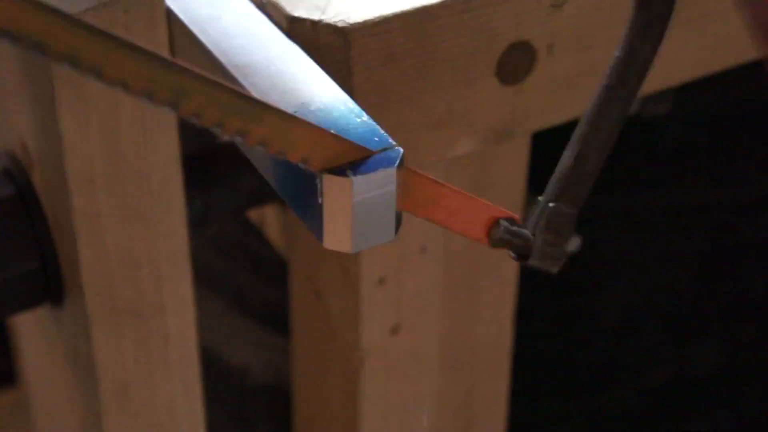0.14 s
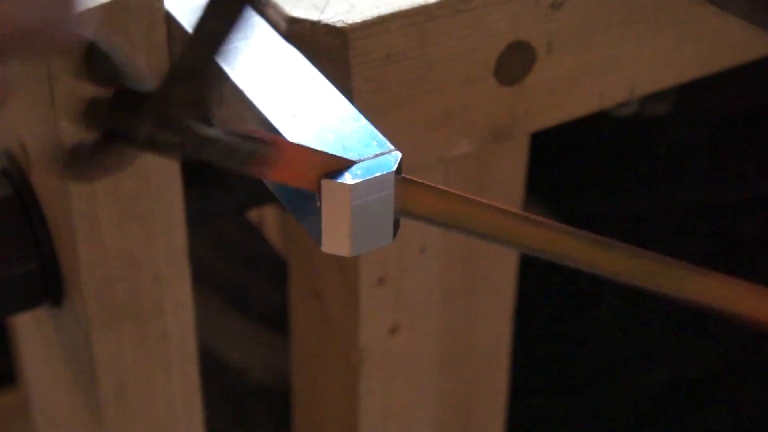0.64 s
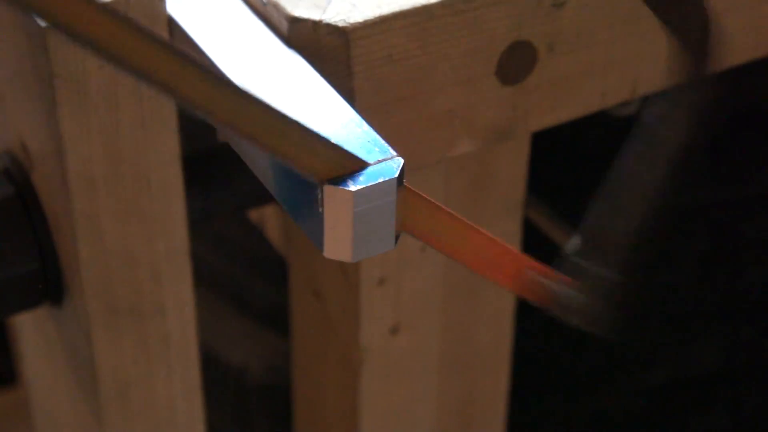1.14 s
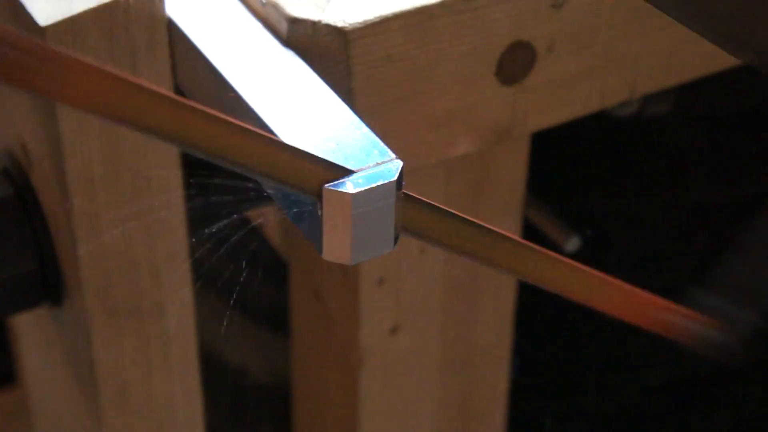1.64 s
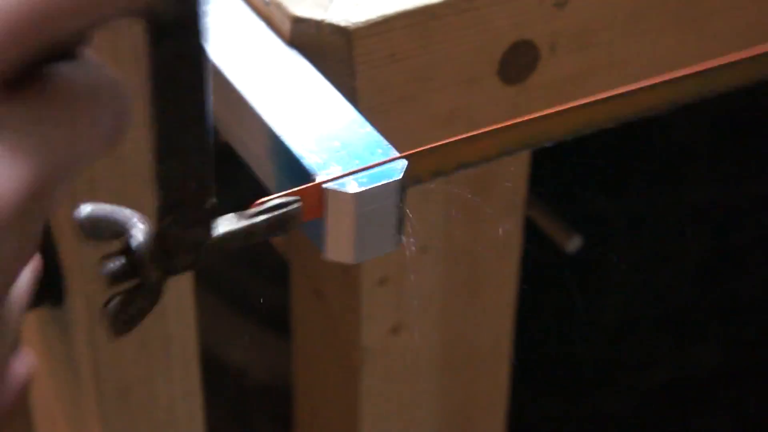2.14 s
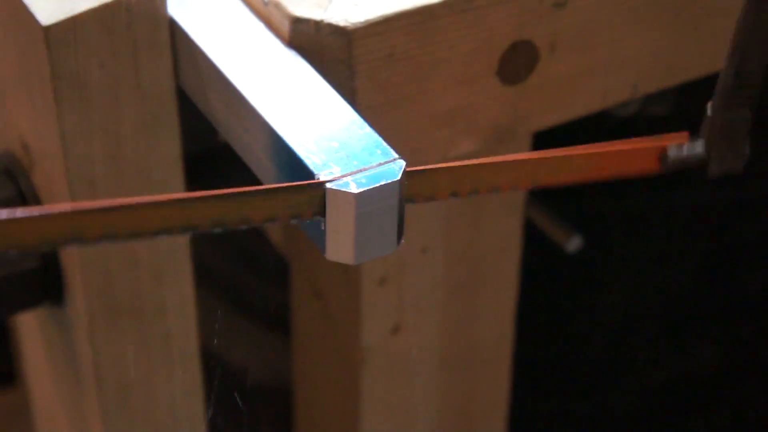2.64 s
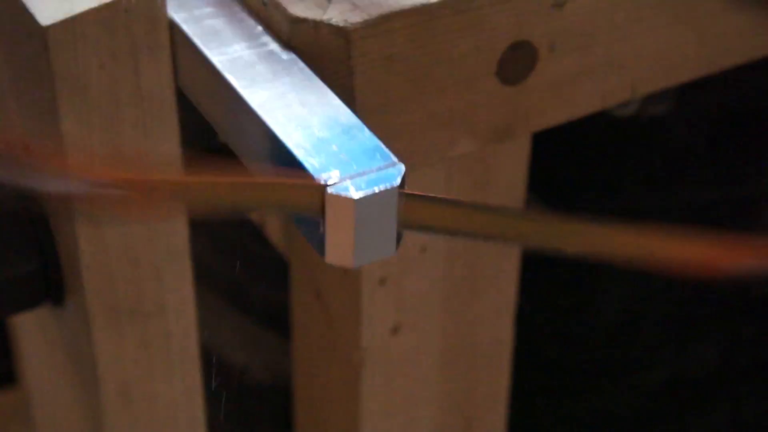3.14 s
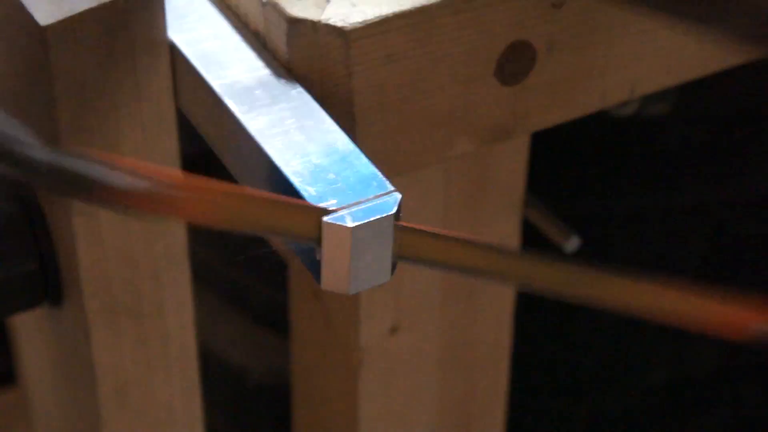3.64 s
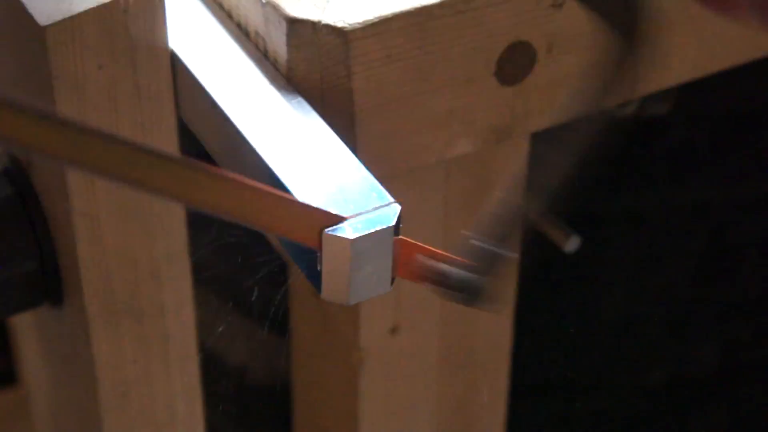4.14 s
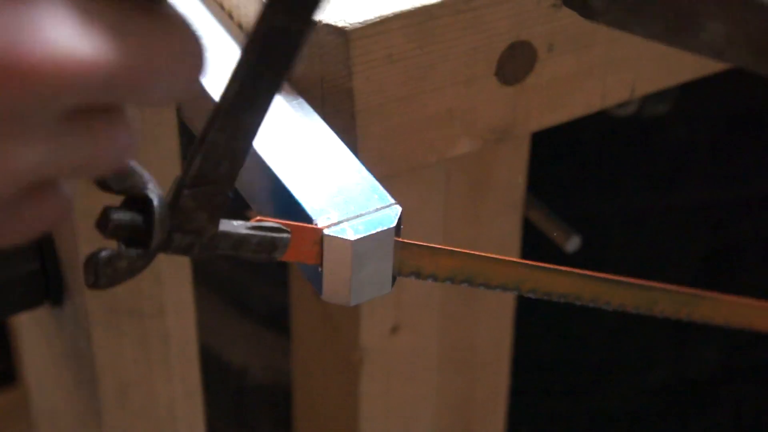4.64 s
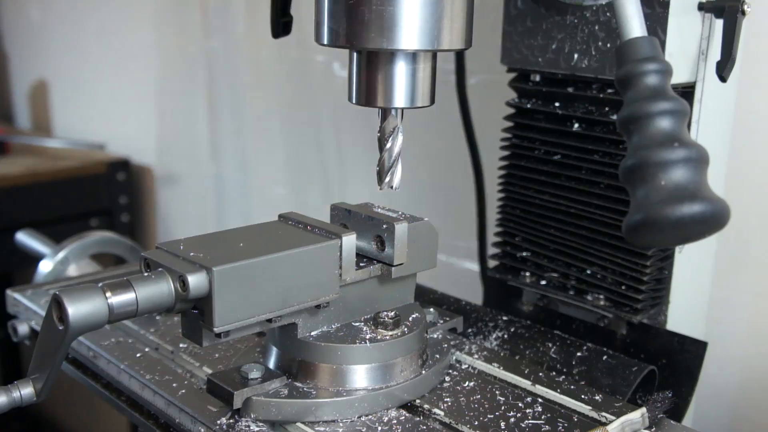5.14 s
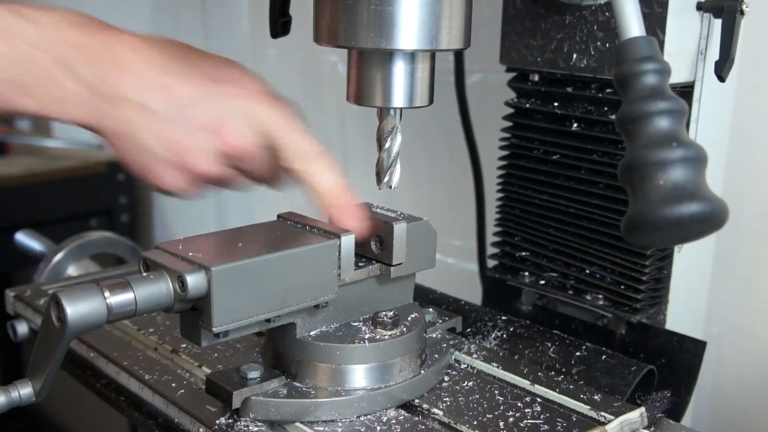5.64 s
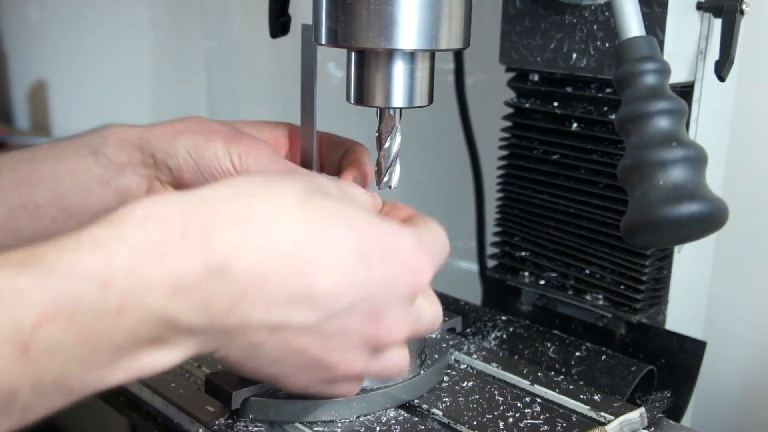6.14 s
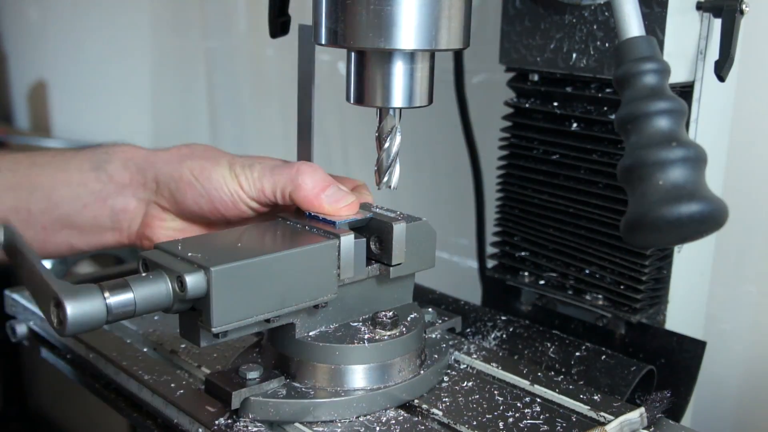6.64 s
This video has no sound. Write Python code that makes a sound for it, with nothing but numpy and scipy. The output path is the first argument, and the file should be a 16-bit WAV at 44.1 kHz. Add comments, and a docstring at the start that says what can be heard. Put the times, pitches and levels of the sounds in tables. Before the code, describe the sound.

Very fast metallic saw strokes buzz close and dry for over four seconds, followed by small clinks, a brief silence, and soft vise handling.

```python
"""At a wooden bench, close and dry, in stereo: a hacksaw cuts a clamped aluminium bar, played back fast,
about 22 short strokes a second. Clicks of the teeth hiss and ring blade and frame; each push booms in the bench.
The sawing stops; puffs of noise are the hands' brushes and taps on steel, while the blade slides out.
After some 30 ms of silence with a tick near its end comes a quiet workshop: more ticks, steel pieces set
into a vise with taps that ring tuned resonances, rustle of hands and cloth, room noise and a faint hum."""
import sys
import numpy as np
from scipy import signal
from scipy.fft import rfft, irfft, next_fast_len
from scipy.io import wavfile

SR = 44100
rng = np.random.default_rng(int(sys.argv[2]) if len(sys.argv) > 2 else 0)


def volts_from_db(level):
    """Convert decibel levels to linear amplitude ratios."""
    exponent = np.asarray(level, float) / 20
    return 10 ** exponent


def unload_wav(signal):
    """Save mono or channel-first audio to the path in sys.argv[1] as 16-bit WAV at rate SR, clipped to [-1, 1]."""
    wavfile.write(
        sys.argv[1],
        SR,
        np.round(np.clip(np.atleast_2d(signal).T, -1, 1) * 32767).astype(np.int16),
    )


N = 298557

# saw strokes, forward and return in turn: (turn time [s], force on the teeth [dB], push on the bench [dB])
STROKES = [(-.02, -25.5, -21), (0.022, -28, -23), (0.068, -29.5, -27.5), (0.111, -26.5, -25),
           (0.157, -26, -26.5), (0.201, -24, -20), (0.248, -25, -26), (0.293, -26.5, -22.5),
           (.337, -26.5, -28), (0.391, -24.5, -22), (.435, -26, -24.5), (0.48, -25.5, -26),
           (0.522, -30.5, -26), (0.566, -27, -21.5), (0.611, -30, -26), (0.657, -27.5, -20.5),
           (.698, -29.5, -22), (0.741, -29.5, -22.5), (0.787, -28, -26), (0.831, -28.5, -23.5),
           (0.874, -27, -26), (0.918, -24, -21), (.965, -28, -24), (1.008, -29, -23.5), (1.049, -30, -27.5),
           (1.096, -25, -21), (1.146, -27.5, -23.5), (1.19, -29, -24.5), (1.232, -25.5, -24),
           (1.274, -25, -22), (1.321, -28, -21.5), (1.367, -26, -22.5), (1.411, -29, -23.5),
           (1.454, -25, -21.5), (1.501, -28.5, -22.5), (1.544, -31, -23), (1.59, -29.5, -25.5),
           (1.633, -26.5, -21.5), (1.675, -29, -24), (1.723, -26.5, -23), (1.764, -27.5, -27),
           (1.811, -28, -25), (1.891, -33.5, -40.5), (1.98, -23.5, -18.5), (2.011, -30, -21.5),
           (2.056, -27.5, -21), (2.111, -27.5, -23.5), (2.157, -30, -22.5), (2.205, -33, -22.5),
           (2.25, -30, -26), (2.288, -33, -25), (2.335, -30.5, -22), (2.379, -33, -22),
           (2.419, -29.5, -23.5), (2.464, -33, -23.5), (2.506, -28.5, -17), (2.552, -31, -23.5),
           (2.601, -29.5, -19), (2.644, -30.5, -23), (2.694, -29, -19), (2.735, -30.5, -27),
           (2.886, -25.5, -20.5), (2.927, -27, -22), (2.985, -25.5, -23.5), (3.029, -26, -20),
           (3.078, -26.5, -23), (3.123, -24.5, -23.5), (3.17, -26, -24), (3.212, -25, -25),
           (3.261, -27, -25), (3.31, -23, -25), (3.355, -24.5, -22.5), (3.4, -25, -27),
           (3.448, -26.5, -25.5), (3.488, -30, -26.5), (3.542, -25.5, -24.5), (3.585, -29, -28),
           (3.635, -25, -24), (3.68, -26, -23.5), (3.727, -23.5, -23.5), (3.768, -27.5, -24.5),
           (3.822, -24.5, -22), (3.867, -24.5, -24), (3.912, -22, -21.5), (3.957, -27.5, -25),
           (4.011, -23.5, -23), (4.055, -27, -26), (4.106, -25.5, -24.5), (4.15, -24.5, -24.5),
           (4.201, -24, -23), (4.246, -28, -26), (4.296, -22, -22), (4.336, -26, -27), (4.384, -24, -23.5),
           (4.426, -26.5, -26.5), (4.477, -23.5, -28), (4.52, -23, -26), (4.564, -23.5, -23)]
# spectrum shape of the tooth hiss: (frequency [Hz], relative density [dB per Hz])
TEETH_SPECTRUM = [(710, -34), (1200, -4), (1940, -12), (2270, -11.5), (2760, -9.5), (3740, -4.5),
                  (4420, -0.5), (5300, -10), (5900, -7), (9880, -11.5), (11200, -18), (13000, -24)]
# spectrum shape of the wooden bench: (frequency [Hz], relative density [dB per Hz])
BENCH_SPECTRUM = [(71, -38), (120, -39), (420, -19), (673, -5.5), (893, -11.5), (994, -8), (1180, -14.5),
                  (1950, -19.5), (2520, -24), (3000, -21.5), (3900, -32.5), (6600, -120)]
# resonances of bench, frame and blade: (frequency [Hz], width [Hz], level against the driving force [dB])
LOW_BENCH_MODES = [(197.6, 50, -38), (569.5, 27, -21), (631.7, 28, -22), (658.3, 45, -14.5), (700, 27, -15),
                   (773.5, 77, -14), (842, 54, -19.5)]
UPPER_BENCH_MODES = [(918, 260, -23.5), (985, 130, -21.5), (1029, 110, -25)]
FRAME_MODES = [(1310, 107, -20), (1401, 77, -23), (1542, 100, -23.5), (1768, 310, -27.5), (1846, 210, -23),
               (1996, 160, -22), (2696, 71, -26.5)]
LOW_BLADE_MODES = [(4410, 180, -16), (4637, 260, -18)]
HIGH_BLADE_MODES = [(5075, 380, -6.5), (5234, 230, -12), (5470, 290, -17), (6810, 130, -30.5),
                    (7850, 580, -22)]
# stereo place of the saw: (frequency [Hz], left minus right [dB])
SAW_BALANCE = [(60, -2.0), (230, 0), (900, -3.5), (3480, 1), (13400, 2)]
# slow change of colour: (time [s], upper bench modes [dB], frame modes [dB], low blade modes [dB],
# high blade modes [dB], tooth treble above 7 kHz [dB])
SAW_COLOUR = [(0, -8, 4, 4, -3.5, -5), (.55, 9, 10.5, 2, -8, 1), (1.1, -5.5, 8, -2, -4.5, 2.5),
              (1.6, 8, 7, -3, -7.5, 2.8), (2.0, 5, 1, -8, -5, -4.5), (2.3, -5.5, 13.5, -16, -6.5, 6),
              (2.8, -10, -1.5, -2, -3.5, 0), (3.15, 2, -18, 0, 1.5, -2), (3.9, 2.5, -41, -1, -3, -6),
              (4.6, 2.5, 1.5, -5, 0, -7)]
# the blade hardly lifts between forward and return while the saw is tipped down:
# (time [s], level added at that turn [dB])
RETURN_TURN = [(1.8, 0.5), (2.0, 9), (2.55, 4), (2.7, -3), (2.95, -2)]
# teeth that snag and knock the frame and bench: (time [s], level of the main tone [dB], ringing [Hz])
SNAGS = [(.037, -18, 779), (.123, -17, 660), (.301, -20, 730), (.404, -14.5, 1018), (.491, -18.5, 840),
         (.757, -15.5, 959), (.928, -26, 900), (1.173, -20.5, 700), (1.374, -18.5, 680),
         (1.735, -19.5, 837), (1.825, -16.5, 850), (1.988, -18.5, 627), (2.067, -19, 985),
         (2.171, -16, 935), (2.213, -20.5, 1250), (2.259, -13, 962), (2.344, -13, 1036),
         (2.437, -14.5, 987), (2.519, -14.5, 980), (2.612, -12, 837), (2.656, -18.5, 670),
         (2.704, -9.5, 756), (2.902, -17, 748), (2.997, -16, 760), (3.177, -15.5, 691), (3.236, -18.5, 985),
         (3.372, -18.5, 1003), (3.414, -18, 656), (3.466, -20, 1033), (3.652, -25, 997), (3.92, -24, 746),
         (4.114, -16, 668), (4.349, -22.5, 653), (4.397, -21.5, 812), (4.493, -16, 993),
         (4.572, -15.5, 637)]
# background of the two rooms: (time [s], room noise [dB], rustle [dB])
ROOM_LEVELS = [(4.5, -64, -54), (4.66, -70, -57), (4.69, -56.5, -59.5), (4.89, -58.5, -62),
               (5.01, -60.5, -66), (5.12, -63, -77), (5.2, -60, -68), (5.36, -58.5, -63.5),
               (5.52, -60, -65.5), (5.86, -59.5, -69), (6.29, -56, -67.5), (6.47, -58.5, -70),
               (6.77, -58, -71)]
# spectrum shapes of room noise and of rustling: (frequency [Hz], relative density [dB per Hz])
ROOM_SPECTRUM = [(71, -50), (120, -16), (208, -5.5), (238, -6.5), (389, -7.5), (773, -7), (1310, -13.5),
                 (2500, -18.5), (4970, -29.5), (11100, -36), (12200, -34), (13000, -66)]
RUSTLE_SPECTRUM = [(600, -17), (1800, -6), (3500, -7.5), (7000, -11.5), (11000, -12.5), (13000, -47)]
# hum of the second room: (frequency [Hz], width [Hz], level [dB])
HUM_TONES = [(241, 2.5, -69), (280, 2.5, -68), (302, 2.5, -72), (355, 2.5, -69), (2570, 60, -70)]
# low rumble: (time [s], level [dB])
RUMBLE_LEVEL = [(0, -73.5), (2.25, -71), (2.45, -55), (2.65, -73.5), (4.4, -69), (4.65, -81), (5.5, -71.5),
                (6.77, -65.5)]
# fingers and cloth brush against metal: (time [s], nominal peak [dB], length scale [ms])
TOUCHES = [(4.7087, -37.5, 20.5), (4.753, -50, 13), (5.063, -53, 20), (5.1386, -54, 18), (5.2067, -46, 12),
           (5.2717, -45.5, 12), (5.31, -56, 6), (5.342, -48, 24), (5.3836, -48, 13), (5.418, -42.5, 19),
           (5.462, -51, 8), (5.529, -45.5, 16), (5.71, -56, 14), (5.749, -49, 13), (5.804, -48.5, 13),
           (5.8541, -50.5, 10.5)]
# steel meets steel: (time [s], nominal peak [dB], centre [Hz], length scale [ms], drive to the steel's ring [dB])
KNOCKS = [(4.9465, -37, 7140, 12, -10.5), (4.9838, -28.5, 7660, 12.6, -27), (5.034, -28, 6400, 12.4, -27),
          (6.0711, -31.5, 3380, 5, -0.5), (6.073, -38.5, 945, 10.4, -30), (6.073, -34.5, 2830, 10, -30),
          (6.0898, -39, 2360, 7.9, -32), (6.1033, -39, 2440, 9.4, -13.5), (6.196, -47, 2500, 7, -30),
          (6.2273, -42.5, 5040, 8, -15), (6.2488, -38.5, 3280, 7.7, -24), (6.2951, -49, 3000, 11, -30),
          (6.31, -48, 3500, 11, -30), (6.3275, -42, 4200, 9.1, -28), (6.4113, -41.5, 5000, 6.8, 2)]
# resonances of the steel pieces: (frequency [Hz], width [Hz], level against the drive [dB])
STEEL_MODES = [(1050, 140, -9), (1950, 130, -10), (3450, 280, -13), (4300, 280, -12), (6900, 270, -7),
               (8660, 86, 5)]
# the blade slides out of the cut: (time [s], rub level [dB])
SLIDE_LEVEL = [(4.74, -92), (4.876, -61), (5.01, -65.5), (5.08, -90)]
# blade resonances under the slide: (frequency [Hz], width [Hz], level against the rub [dB])
SLIDE_MODES = [(2136, 273, 3.5), (4600, 650, -2), (6600, 400, -10)]
# thin dry ticks: (time [s], peak before the stereo tilt [dB])
TICKS = [(5.112, -44), (5.1546, -33.5), (5.1973, -38), (5.24, -40)]

PAUSE_S = .066   # a longer wait for the next turn is a pause; the stroke after it goes forward
LAST_STROKE_S = 0.045   # length of a stroke before a pause
# shape of a stroke, (forward, return): level at the turn before it [dB], turn to full force [ms]
TEETH_TURN_DB, BITE_MS = (-46, -46), (13, 20.2)
BENCH_TURN_DB, PUSH_MS = (-33.5, -30), (20.3, 18)
PUSH_LATER_MS_PER_S = (2.87, .3)   # the push on the bench peaks later as the cut deepens
TEETH_RELEASE_DB_PER_S, BENCH_RELEASE_DB_PER_S = 332, 369   # in a pause
LEAD_IN_DB_PER_S = 500   # the blade settles into the cut before the stroke that ends a pause
SNAG_T60_S = 0.06
TOUCH_HZ, TOUCH_OCTAVES, TOUCH_RING_DB = 2500, 6.5, -25
KNOCK_OCTAVES, TAP_TOP_HZ = 1.43, 12200
PUFF_CREST_DB = 4.5   # allowance for the peak of a noise puff above its rms
SILENCE_S, RETURN_S, FADE_IN_S = 5.083, 5.113, 0.0069
MIC_STOP_HZ = 13600   # the microphone's treble is 50 dB down from here up


def in_time(seconds, values):
    """Points joined by straight lines, one value a sample."""
    return np.interp(np.arange(N) / SR, seconds, values)


def at_hz(points, hz):
    """A spectrum read on a log-frequency axis."""
    point_hz, point_db = np.transpose(points)
    return np.interp(np.log(hz + 1), np.log(point_hz), point_db)


def colour(x, spectrum):
    """A smooth spectrum laid on x; white input keeps its rms."""
    size = next_fast_len(N + 4096)
    gain = volts_from_db(at_hz(spectrum, np.arange(size // 2 + 1) * SR / size))
    gain = gain / np.sqrt(np.mean(gain ** 2))
    return irfft(rfft(x, size) * gain, size)[..., :N]


def resonate(x, hz, width_hz):
    """One resonance as a two-pole filter; white input keeps its rms."""
    r = np.exp(-np.pi * width_hz / SR)
    b = np.sqrt((1 - r * r) / 2) * np.array([1, 0, -1])
    return signal.lfilter(b, [1, -2 * r * np.cos(2 * np.pi * hz / SR), r * r], x + 1e-18)


def grains(per_s, spread_db):
    """Random clicks of uneven size, unrelated in the two channels; overall rms 1."""
    uneven = volts_from_db(spread_db * np.minimum(rng.exponential(1, (2, N)), 5))
    sizes = uneven * rng.standard_normal((2, N))
    clicks = sizes * (rng.random((2, N)) < per_s / SR)
    return clicks / np.sqrt(np.mean(clicks ** 2))


def stroke_level(peak_db, turn_db, rise_ms, later_ms_per_s, release_db_per_s, roundness):
    """Force dips at each turn, rounds over a peak within the stroke and dies away in a pause."""
    turn_s = np.array(STROKES)[:, 0]
    wait_s, count = np.diff(turn_s, append=np.inf), np.arange(len(turn_s))

    # 0 forward, 1 return; the first row is a return
    fresh = np.where(np.roll(wait_s, 1) > PAUSE_S, count, 0)
    fresh[0] = 0
    way = (count - np.maximum(np.maximum.accumulate(fresh), 1)) % 2

    length_s = np.where(wait_s > PAUSE_S, LAST_STROKE_S, wait_s)
    rise_s = (np.take(rise_ms, way) + np.take(later_ms_per_s, way) * turn_s) / 1000
    rise_s = np.minimum(rise_s, .9 * length_s)

    # k: the stroke under way at each sample
    k = np.searchsorted(turn_s, np.arange(N) / SR, "right") - 1
    since = np.arange(N) / SR - turn_s[k]
    rising = since < rise_s[k]
    falling_part = np.minimum((since - rise_s[k]) / (length_s - rise_s)[k], 1)
    off_peak = np.where(rising, 1 - since / rise_s[k], falling_part)

    # the nearer turn, named by the stroke that it begins
    next_way = np.where(rising, way[k], 1 - way[k])
    low_db = np.take(turn_db, next_way) + next_way * in_time(*np.transpose(RETURN_TURN))
    level_db = peak_db[k] - np.maximum(peak_db[k] - low_db, 6) * off_peak ** roundness
    fading_db = level_db - release_db_per_s * np.maximum(since - length_s[k], 0)
    settling_db = turn_db[0] - 6.5 - LEAD_IN_DB_PER_S * (wait_s[k] - since)
    return volts_from_db(np.maximum(fading_db, settling_db))


def ring_modes(force, modes, drift_db, scatter_db, wander):
    """Every stroke meets each mode with a strength and a slightly shifted pitch of its own."""
    turn_s, out = np.array(STROKES)[:, 0], np.zeros((2, N))
    end = round((turn_s[-1] + .2) * SR)
    stroke = np.searchsorted(turn_s, np.arange(end) / SR)
    driven = (force * volts_from_db(drift_db))[:, :end] + 1e-18
    for hz, width_hz, level_db in modes:
        chance = rng.standard_normal((2, len(turn_s) + 1))
        gain = volts_from_db(level_db + scatter_db * chance[0])[stroke]
        pitch_hz = (hz * (1 + wander * chance[1]))[stroke]
        turning = np.exp(2j * np.pi * np.cumsum(pitch_hz) / SR)
        # a moving resonance: shift its centre down to 0 Hz, low-pass twice, shift back
        r = np.exp(-np.pi * width_hz / SR)
        shifted = driven * (gain * turning.conj())
        slow = signal.lfilter([np.sqrt(8 * (1 - r) ** 3)], [1, -2 * r, r * r], shifted)
        out[:, :end] += (slow * turning).real
    return out


def brighten(x, treble_db):
    """A shelf above 7 kHz that changes in time."""
    low = signal.sosfilt(signal.butter(1, 7000, fs=SR, output="sos"), x)
    return low + volts_from_db(treble_db) * (x - low)


def blade(bite, low_db, high_db):
    """Tooth impacts ring the blade's low and high resonances."""
    low = ring_modes(bite, LOW_BLADE_MODES, low_db, scatter_db=5.5, wander=0.014)
    return low + ring_modes(bite, HIGH_BLADE_MODES, high_db, scatter_db=2.5, wander=0.025)


def bench(push, upper_db):
    """The push of each stroke booms in the wood: a broad body of noise and separate resonances."""
    body = volts_from_db(-1.5) * colour(push, BENCH_SPECTRUM)
    low = ring_modes(push, LOW_BENCH_MODES, 0, scatter_db=3.0, wander=0.021)
    return body + low + ring_modes(push, UPPER_BENCH_MODES, upper_db, scatter_db=6.5, wander=0.014)


def hacksaw():
    """Tooth impacts hiss and ring blade and frame; the push of the stroke shakes the bench."""
    turn_s, bite_db, push_db = np.transpose(STROKES)
    s, *drifts = np.transpose(SAW_COLOUR)
    upper_db, frame_db, low_blade_db, high_blade_db, treble_db = [in_time(s, d) for d in drifts]
    bite = grains(20000, spread_db=1.5) * stroke_level(
        bite_db, TEETH_TURN_DB, BITE_MS, (0, 0), TEETH_RELEASE_DB_PER_S, roundness=1.78)
    push = grains(9000, spread_db=1.5) * stroke_level(
        push_db, BENCH_TURN_DB, PUSH_MS, PUSH_LATER_MS_PER_S, BENCH_RELEASE_DB_PER_S, roundness=1.1)

    teeth = volts_from_db(-4.0) * brighten(colour(bite, TEETH_SPECTRUM), treble_db)
    frame = ring_modes(bite, FRAME_MODES, frame_db, scatter_db=5.0, wander=0.02)
    high = teeth + blade(bite, low_blade_db, high_blade_db)
    low = bench(push, upper_db) + frame + snags()

    # high and low parts each take the left-right balance of one frequency
    side = np.array([[.5], [-.5]])
    saw = high * volts_from_db(side * at_hz(SAW_BALANCE, 3200)) + low * volts_from_db(side * at_hz(SAW_BALANCE, 820))
    return signal.sosfilt(signal.butter(2, 90, "high", fs=SR, output="sos"), saw)


def room():
    """Broad room noise, a brighter rustle of hands and cloth, and wavering hum tones in the second room."""
    s, noise_db, rustle_db = np.transpose(ROOM_LEVELS)
    noise = volts_from_db(in_time(s, noise_db)) * colour(rng.standard_normal((2, N)), ROOM_SPECTRUM)
    noise = noise * volts_from_db(np.array([[-1.2], [1.2]]))   # leans to the right
    rustle = volts_from_db(in_time(s, rustle_db)) * colour(grains(6000, spread_db=4.0), RUSTLE_SPECTRUM)
    # white noise through narrow resonances wavers like a hum
    white = rng.standard_normal((2, N)) * (np.arange(N) / SR > RETURN_S)
    hum = sum(volts_from_db(level_db) * resonate(white, hz, width_hz) for hz, width_hz, level_db in HUM_TONES)
    return noise + rustle + hum


def rumble():
    """Dull noise around 100 Hz, partly shared by both channels."""
    white = rng.standard_normal((3, N))
    mixed = white[:2] + 0.27 * white[2]
    low = signal.sosfilt(signal.butter(1, [75, 190], "band", fs=SR, output="sos"), mixed)
    low = signal.sosfilt(signal.butter(2, 200, fs=SR, output="sos"), low)
    return volts_from_db(in_time(*np.transpose(RUMBLE_LEVEL))) * low / low.std()


def snags():
    """A snag swells within milliseconds and rings on one pitch with a weaker neighbour."""
    out, t = np.zeros((2, N)), np.arange(6000) / SR
    phase = np.array([[0], [np.pi / 2]])   # a quarter cycle apart left and right
    shape = (1 - np.exp(-t / 0.00085)) * volts_from_db(-60 * (t / SNAG_T60_S) ** 1.285)
    for s, level_db, hz in SNAGS:
        start, detune = 2 * np.pi * rng.random(2), 1 + 0.032 * rng.standard_normal()
        main = np.sin(2 * np.pi * hz * t + start[0] + phase)
        neighbour = 0.55 * np.sin(2 * np.pi * hz * detune * t + start[1] - phase)
        i = round(s * SR)
        out[:, i:i + 6000] += volts_from_db(level_db) * shape * (main + neighbour)
    return out


def taps():
    """Each contact is a soft-edged puff of noise around its centre and drives the steel, weakly or strongly."""
    out, struck = np.zeros((2, N)), np.zeros((len(STEEL_MODES), 2, N))
    rows = [(s, db, TOUCH_HZ, TOUCH_OCTAVES, ms, TOUCH_RING_DB) for s, db, ms in TOUCHES]
    rows += [(s, db, hz, KNOCK_OCTAVES, ms, ring_db) for s, db, hz, ms, ring_db in KNOCKS]
    for s, peak_db, hz, octaves, ms, ring_db in rows:
        noise, strength_db = rng.standard_normal((2, 2500)), rng.normal(0, 1.9, len(STEEL_MODES))
        u = np.arange(2500) / SR / (ms / 1000)
        shape = (u / .55 * np.exp(1 - u / .55)) ** 6   # fullest at 0.55 of the length scale
        edges = np.clip(hz * 2 ** (np.array([-.5, .5]) * octaves), 60, .45 * SR)
        dull = signal.lfilter([1], [1, -.8], noise)
        puff = signal.sosfilt(signal.butter(2, edges, "band", fs=SR, output="sos"), dull)
        i = round((s - .003) * SR)   # starts 3 ms ahead of its listed time
        out[:, i:i + 2500] += volts_from_db(peak_db - PUFF_CREST_DB) * shape * puff / puff.std()
        drive = volts_from_db(peak_db + ring_db + strength_db)[:, None, None]
        struck[:, :, i:i + 2500] += drive * shape * noise
    for force, (hz, width_hz, level_db) in zip(struck, STEEL_MODES):
        out += volts_from_db(level_db) * resonate(force, hz, width_hz)
    return signal.sosfilt(signal.butter(4, TAP_TOP_HZ, fs=SR, output="sos"), out)


def slide():
    """Light friction excites a few broad resonances of the blade."""
    s, level_db = np.transpose(SLIDE_LEVEL)
    t = np.arange(N) / SR
    touching = (t > s[0]) & (t < s[-1])
    rub = rng.standard_normal((2, N)) * volts_from_db(in_time(s, level_db)) * touching
    return sum(volts_from_db(mode_db) * resonate(rub, hz, width_hz) for hz, width_hz, mode_db in SLIDE_MODES)


def ticks():
    """Single one-sided pulses a tenth of a millisecond long, a little to the right."""
    clicks = np.zeros(N)
    clicks[[round(s * SR) for s, db in TICKS]] = volts_from_db(np.array(TICKS)[:, 1])
    return np.convolve(clicks, np.hanning(7), "same") * volts_from_db(np.array([[-1.5], [1.5]]))


def scene():
    """The first place falls silent abruptly, the second fades in; the ticks stand outside these fades."""
    heard = in_time([SILENCE_S - .003, SILENCE_S, RETURN_S, RETURN_S + FADE_IN_S], [1, 0, 0, 1])
    return (hacksaw() + room() + rumble() + taps() + slide()) * heard + ticks()


def band_limit(x):
    """A steep low-pass at the top of the band."""
    return signal.sosfilt(signal.butter(12, 14050, fs=SR, output="sos"), x)


def record(dry):
    """The microphone's top is cut steeply."""
    mix = signal.sosfilt(signal.cheby2(12, 50, MIC_STOP_HZ, fs=SR, output="sos"), dry)
    return band_limit(mix)


dry = scene()
out = record(dry)
unload_wav(out)
```